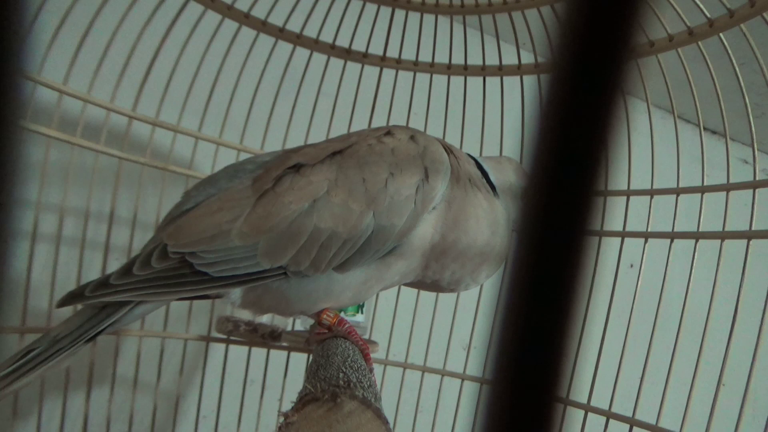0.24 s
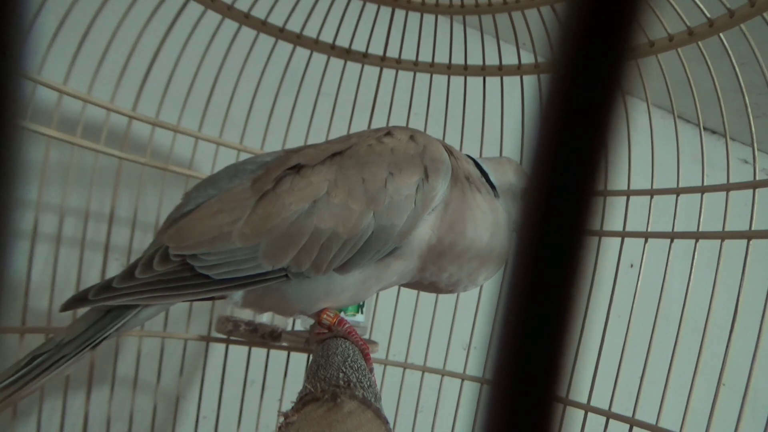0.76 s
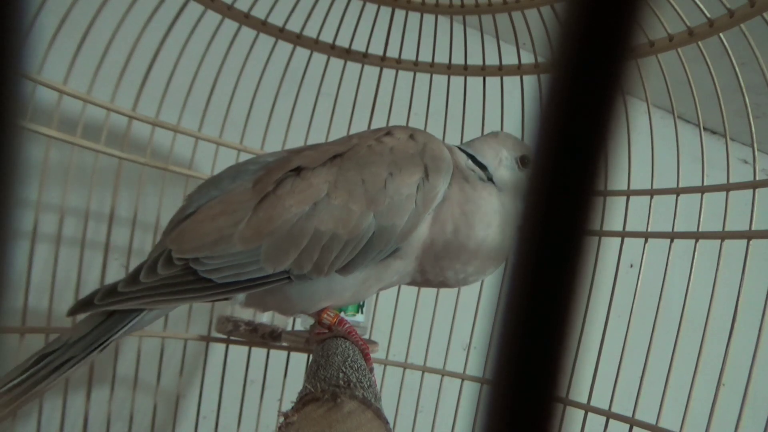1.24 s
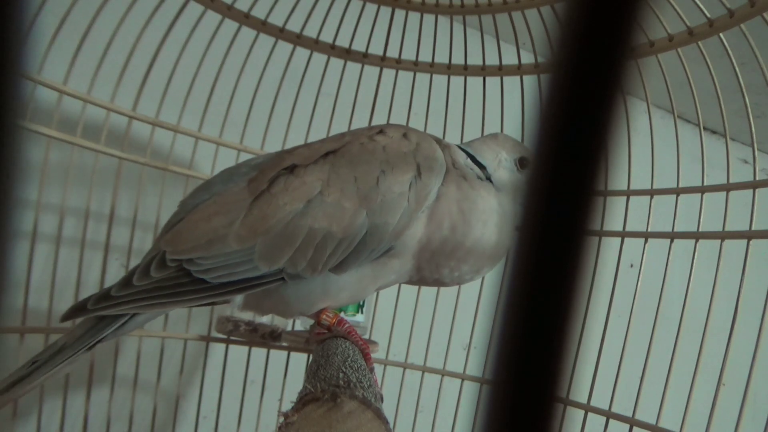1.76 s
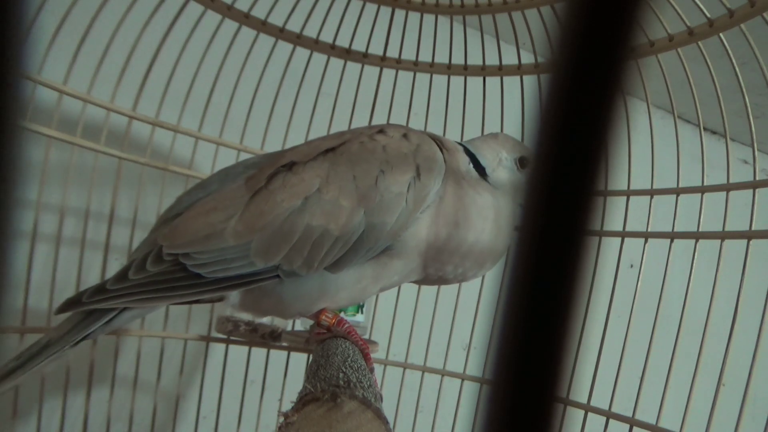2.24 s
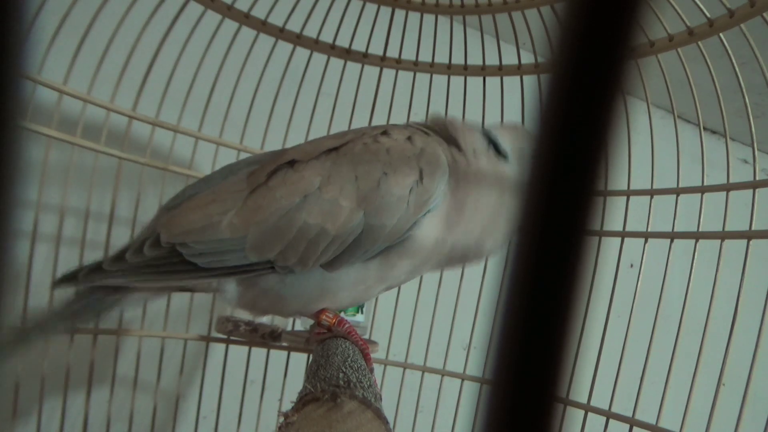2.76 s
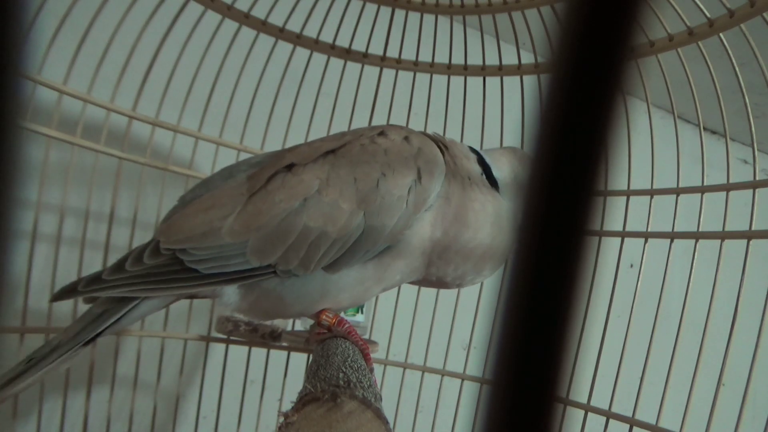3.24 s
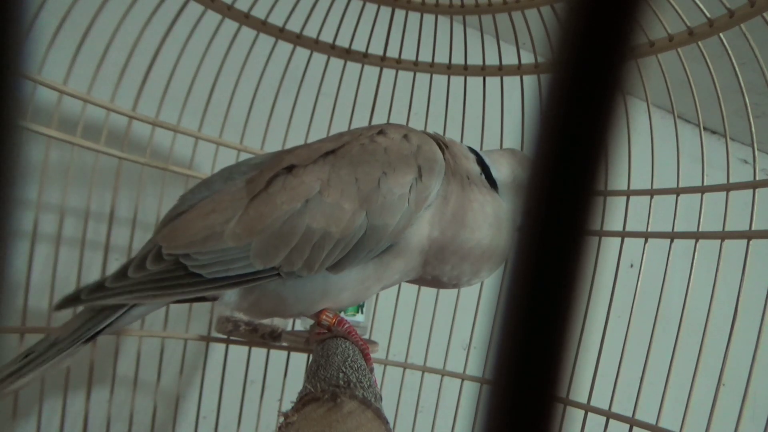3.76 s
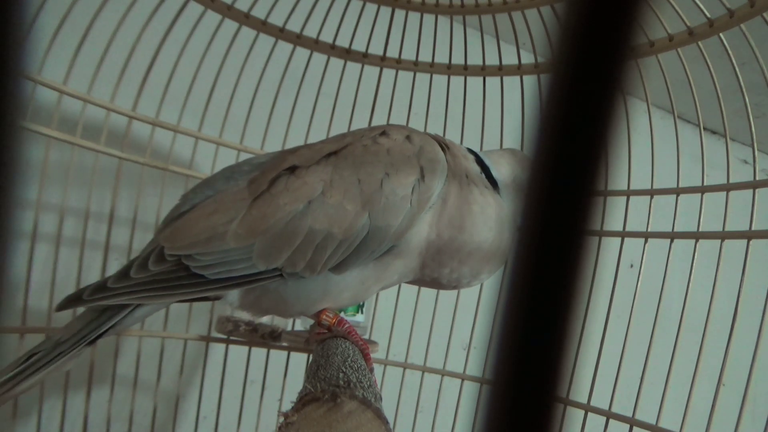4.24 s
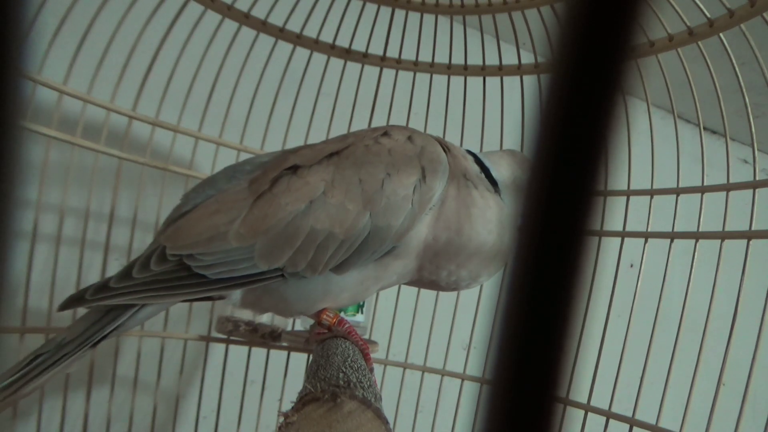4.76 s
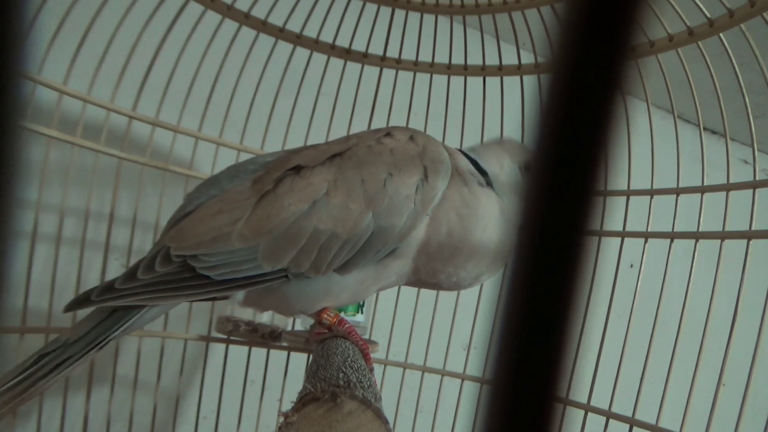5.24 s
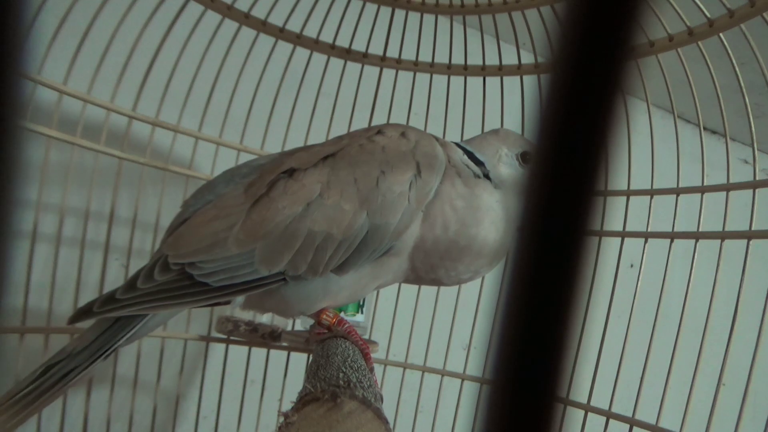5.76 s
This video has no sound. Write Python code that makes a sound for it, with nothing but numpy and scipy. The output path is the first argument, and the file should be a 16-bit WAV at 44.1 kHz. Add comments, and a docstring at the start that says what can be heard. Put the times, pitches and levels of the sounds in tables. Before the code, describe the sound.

Close to the microphone, a dove's smooth, hollow coo is already sounding; it wavers, sags and breaks into a short low tail. Small raspy chirps come early from another bird further off. Nasal, buzzing moans of drawn air follow, then a brief hoot, a stuttering trill and a second long falling coo. The hard room rings long around it, with faint cage ticks, low rumble and soft hiss.

```python
"""A long dove's coo, already under way, sags and breaks into a low tail while a small bird chirps further off.
Low nasal moans of drawn air follow, then a short note, a stuttering trill and a second long falling coo.
The dove is a near-pure gliding tone with faint overtones and rushing air; its moan is a resonant buzz.
The chirps are roughened glides and the cage ticks are dying noise bursts. Room modes ring against the coo,
a diffuse tail follows every call, and steady rumble and hiss lie beneath."""
import sys
import numpy as np
from scipy import signal
from scipy.fft import rfft, irfft, next_fast_len
from scipy.io import wavfile
from scipy.ndimage import map_coordinates

SR = 44100
rng = np.random.default_rng(int(sys.argv[2]) if len(sys.argv) > 2 else 0)


def persist_wave(psi):
    """Save psi, clipped to +-1, as 16-bit WAV."""
    counts = np.round(np.clip(psi, -1, 1) * 32767).astype(np.int16)
    wavfile.write(sys.argv[1], SR, np.atleast_2d(counts).T)


N = 264820

# Long coos, in the upper register from jump to break; the first begins before 0 s:
# jump_s, break_s, level_db, pitch_hz, slow_sag_hz, last_droop_hz
LONG_COOS = [(-0.508, 1.399, -10.5, 557.6, 47.18, 35.8), (3.868, 5.743, -11.5, 558.4, 73.15, 6.3)]
# Short notes that stay in the upper register: jump_s, end_s, level_db, pitch_hz, sag_hz, low_lead_in_db
SHORT_NOTES = [(2.81, 2.954, -11.5, 573.1, 45.3, -7.5), (3.782, 3.803, -10.5, 512.5, 13, -40)]
# Pulses of the low trill leading into each long coo: start_before_jump_s, length_s, level_db
TRILL_PULSES = [(.483, .05, -29), (.385, .03, -22), (.341, .045, -20), (.296, .054, -17.6),
                (.234, .054, -16), (.171, .074, -16.3), (.058, .05, -21)]
# Brief swells and dips of the sung tone: centre_s, half_width_s, change_db
LEVEL_WAVERS = [(.44, .1, 2), (.71, .06, -2.5), (1.12, .07, -6), (1.298, .035, 3.3), (5.35, .055, -4)]
# Overtones escaping the closed beak, relative strength: frequency_hz, level_db
BEAK_RESPONSE = [(900, -58.5), (1060, -42.5), (1250, -50.5), (1450, -36), (1560, -34.5), (1720, -37),
                 (1930, -56.5), (2110, -50), (2600, -72), (4200, -68.5), (4800, -52), (5500, -77.5),
                 (7300, -61), (8400, -71), (9500, -63), (11000, -71)]
# Change of overtone strength around the break between registers: pitch_hz, change_db
REGISTER_BRIGHTNESS = [(410, -1), (435, -3.5), (455, -12), (485, -4.5), (510, 2.5), (527, 2), (570, 3)]
# Spectrum of the rush of air in the dove's throat: frequency_hz, relative_level_db
AIR_SPECTRUM = [(600, -10), (1500, 0), (2500, -6.5), (4700, -3), (5800, -11), (9500, -10), (14000, -25)]
# Standing waves of the room: resonance_hz, gain_db, t60_s, polarity (+1 or -1)
ROOM_MODES = [(357, -16.5, 2.0, 1), (405, -3.5, 4.2, -1), (403, 0.5, 3.5, -1), (415.6, -8, 1.8, 1),
              (418.7, 3.5, 3.8, 1), (424.3, 0.5, 6.3, 1), (427.6, 1.0, 2.7, 1), (442, 2.7, 5.6, 1),
              (448.7, 9, 6, 1), (464, 4.3, 6.4, -1), (482, -10.5, 2.01, -1), (485, 4.2, 1.9, 1),
              (494.4, 1, 4, 1), (498, -13.5, 2.02, 1), (514.6, -6.5, 3.8, 1), (513.4, -5.5, 1.2, -1),
              (514.6, 12, 2.52, 1), (519, -14.5, 4.1, 1), (526.5, -10.5, 2.7, -1), (537.8, 10.5, 2.9, 1),
              (552.3, 4.5, 4.7, 1), (530, -6, 1.98, 1), (562.4, 9, 2.6, 1), (579, 2, 3.4, 1)]
# Decay of the diffuse tail: frequency_hz, t60_s
DIFFUSE_DECAY = [(200, 3.9), (480, 3.3), (900, 1.4), (1550, 1.8), (3000, 0.75), (10000, 0.47)]
# Spectrum of the room's rumble: frequency_hz, relative_density_db_per_hz
RUMBLE_SPECTRUM = [(12, -39), (20, -16), (32, -14), (102, 1), (231, -10.5), (274, -13), (300, -9.5),
                   (390, -38.5), (660, -120)]
# Spectrum of the steady hiss: frequency_hz, relative_density_db_per_hz
HISS_SPECTRUM = [(250, -3.5), (600, -3.5), (1000, -1.5), (1600, -2), (2200, -8), (4500, -13), (6000, -16),
                 (9500, -17), (12500, -20), (16000, -21)]
# Left-right likeness of noise: frequency_hz, correlation (0-1)
STEREO_LIKENESS = [(60, 0.37), (130, 0), (300, 0), (1500, .5), (5000, 0.36), (10000, 1)]
# Light scratches and ticks in the cage: start_s, relative_level_db
CAGE_CONTACTS = [(0.0247, -42.5), (0.129, -42.5), (1.4392, -46), (1.917, -43.5), (1.9372, -43),
                 (2.1036, -45.5), (2.4033, -43.5), (2.7046, -49), (3.686, -47.5), (3.8831, -43.5),
                 (4.8978, -40.5), (4.9299, -44.5), (5.3131, -41.5), (5.5316, -41)]
# Spectrum of those contacts: frequency_hz, relative_level_db
CONTACT_SPECTRUM = [(1500, -24), (2600, -7), (3600, 0), (4900, -4.5), (6000, -18), (11000, -17),
                    (16000, -30)]
# The small bird's notes, levels before the mix:
# start_s, length_s, start_hz, end_hz, level_db, octave_db, rasp (0-1)
CHIRP_NOTES = [(0.205, 0.067, 4510, 4540, -43.5, -5.5, 0.17), (0.237, 0.064, 4710, 5510, -41, -9, 1),
               (.235, .07, 2300, 3030, -45.5, -18.5, .8), (0.291, .06, 3830, 3300, -44.5, -14.5, 1),
               (0.346, 0.057, 3393, 3805, -39, -12, 0.9), (0.378, 0.065, 4715, 5100, -42.5, -7, .9),
               (0.581, .025, 3460, 3160, -48, -17.5, .6), (0.607, 0.052, 2987, 3494, -39, -15, 0.97),
               (0.629, 0.043, 7030, 5770, -48.5, -20.5, .5), (.66, .04, 4430, 4690, -36, -16.5, 0.8)]
# The dove's voiced intakes of air, levels before the mix:
# start_s, crest_s, end_s, crest_pitch_hz, end_pitch_hz, throat_hz, throat_width_hz,
# level_db, fade_db, whistle_db
AIR_INTAKES = [(1.682, 1.804, 2.43, 205, 147.6, 567, 146.1, -32.5, 14.5, -66.5),
               (2.44, 2.48, 2.69, 130, 116.2, 781.4, 105.4, -38.5, 4.5, -61)]
# Spectrum of the faint whistle of drawn air: frequency_hz, relative_level_db
NOSTRIL_SPECTRUM = [(3500, -25.5), (4900, 0), (6000, -22), (7600, -2), (9000, -25.5)]

LEAD = SR  # samples sounding before 0 s
TOP_HZ = 15600  # band limit
RUMBLE_DB, HISS_DB = -49.5, -56
COO_DIFFUSE_DB = -20  # share of the pure tone in the diffuse tail
LOW_HZ, SCOOP_HZ, SCOOP_S = 420.6, 23.6, .012  # lower register, and its lift just before a jump
ATTACK_S, PUSH_DB = .035, 3.3  # the low swell before a long coo, louder than its held level
FLIP_S = 0.0044  # time to flip between registers
SETTLE_HZ, SETTLE_S, CREEP_HZ_PER_S = 39.83, .11, 14.6  # pitch settles down, then creeps up
SAG_POWER, DROOP_S = 4.15, .068  # as air runs out pitch sags ever faster, then droops at the break
TAIL_SAG_HZ_PER_S, TAIL_FADE_DB_PER_S, RELEASE_S = 95, 54, .007  # low tail after the break
TAIL_S, COLLAPSE_HZ, COLLAPSE_S = .245, 31.95, 0.028  # tail length, and its final drop of pitch
SHORT_SAG_POWER = 1.8  # a short note sags more evenly
TRILL_SKEW = .8  # under 1: a pulse rises faster than it falls
INTAKE_RISE_HZ_PER_S, INTAKE_FALL_POWER = 150, 0.64  # climb to the crest, then an ever slower fall
INTAKE_RELEASE_S = .012


def amp(db):
    """Logarithmic level: decibels become amplitude gain."""
    return 10 ** (np.asarray(db) / 20)


def unit(x):
    """Mean power: a signal is scaled to rms 1."""
    return x / np.sqrt(np.mean(x ** 2) + 1e-20)


def clock():
    """Sampled time in seconds, lead-in included."""
    return np.arange(-LEAD, N) / SR


def along(points, hz):
    """Logarithmic frequency: values are interpolated between (Hz, value) points."""
    f, v = np.transpose(points)
    return np.interp(np.log(hz + 1), np.log(f), v)


def step(x):
    """Smooth transition from 0 to 1 around x = 0."""
    return .5 + .5 * np.tanh(x)


def wobble(rate):
    """Band-limited fluctuation: a smooth curve through random knots, rate per second."""
    at = np.arange(LEAD + N) * rate / SR
    fine = np.arange(0, at[-1] + 1, 1 / 8)
    knots = rng.standard_normal(int(at[-1]) + 4)
    return np.interp(at, fine, map_coordinates(knots, [fine]))


def filtered(x, response):
    """Linear filtering: the spectrum is multiplied by a response of frequency."""
    m = next_fast_len(x.shape[-1] + 3 * SR, True)
    spectrum = rfft(x, m) * response(np.fft.rfftfreq(m, 1 / SR))
    return irfft(spectrum, m)[..., :x.shape[-1]]


def noise(spectrum):
    """Partial coherence: coloured stereo noise of rms 1 is built from independent mid and side."""
    def response(hz):
        turn = np.arccos(np.clip(along(STEREO_LIKENESS, hz), -1, 1)) / 2
        return amp(along(spectrum, hz)) * [np.cos(turn), np.sin(turn)]

    white = rng.standard_normal((2, LEAD + N))
    mid, side = filtered(white, response)
    return unit(np.array([mid + side, mid - side]))


def pan(x, left_db):
    """Interchannel level difference: a mono sound is placed by its excess on the left."""
    g = amp(left_db)
    return np.array([[g], [1]]) * 2 / (1 + g) * x


def jump_up(since, upper_hz, lead_db, held_db):
    """Register transition: pitch and effort swell low, lift, and flip to the upper register."""
    jumped = step(since / FLIP_S)
    low_hz = LOW_HZ + SCOOP_HZ * np.exp(-abs(since) / SCOOP_S)
    lead = amp(lead_db) * np.sin(np.pi / 2 * np.clip(1 + since / ATTACK_S, 0, 1)) ** 2
    return low_hz + jumped * (upper_hz - low_hz), lead + jumped * (amp(held_db) - lead)


def song():
    """Two-register phonation: pitch and effort of a syrinx that rests low and flips up for notes."""
    t = clock()
    pitch, effort = np.full(len(t), float(LOW_HZ)), np.zeros(len(t))
    for jump_s, break_s, db, hz, sag_hz, droop_hz in LONG_COOS:
        for before_s, length, pulse_db in TRILL_PULSES:
            pulse_s = jump_s - before_s
            span = (t > pulse_s) & (t < pulse_s + length)
            u = np.linspace(0, 1, span.sum())
            effort[span] += amp(pulse_db) * np.sin(np.pi * u ** TRILL_SKEW)

        span = (t > jump_s - ATTACK_S) & (t < break_s + TAIL_S + 10 * RELEASE_S)
        since, after = t[span] - jump_s, t[span] - break_s
        held, tail = np.clip(since, 0, break_s - jump_s), np.maximum(after, 0)
        settle = SETTLE_HZ * (1 - np.exp(-held / SETTLE_S)) - CREEP_HZ_PER_S * held
        slow_sag = sag_hz * (held / (break_s - jump_s)) ** SAG_POWER
        droop = droop_hz * np.exp(np.minimum(after, 0) / DROOP_S)
        high = hz - settle - slow_sag - droop
        collapse = COLLAPSE_HZ * np.exp(np.minimum(tail - TAIL_S, 0) / COLLAPSE_S)
        low = LOW_HZ - TAIL_SAG_HZ_PER_S * tail - collapse
        broken = step(after / FLIP_S)
        sung_hz = (1 - broken) * high + broken * low
        pitch[span], swell = jump_up(since, sung_hz, db + PUSH_DB, db)
        effort[span] += swell * amp(-TAIL_FADE_DB_PER_S * tail) * step((TAIL_S - after) / RELEASE_S)

    for jump_s, end_s, db, hz, sag_hz, lead_db in SHORT_NOTES:
        span = (t > jump_s - ATTACK_S) & (t < end_s + 2 * RELEASE_S)
        since = t[span] - jump_s
        spent = np.clip(since / (end_s - jump_s), 0, 1)
        pitch[span], swell = jump_up(since, hz - sag_hz * spent ** SHORT_SAG_POWER, lead_db, db)
        effort[span] += swell * step((end_s - t[span]) / RELEASE_S)

    waver_db = sum(db * np.exp(-((t - s) / width) ** 2) for s, width, db in LEVEL_WAVERS)
    return pitch, effort * amp(waver_db)


def coo(jitter=0.0065, shimmer=0.01, overtone_flutter_db=1.1, air_db=-48.5, full_swing=0.27, knee=.19):
    """Saturating syrinx: an almost pure fundamental, faint overtones and a rush of air."""
    pitch, effort = song()
    phase = 2 * np.pi * (np.cumsum(pitch) / SR + jitter * wobble(130))
    fundamental = np.sqrt(2) * effort * (1 + shimmer * wobble(380)) * np.sin(phase)
    overtones = 0
    for k in range(2, 21):
        level_db = along(BEAK_RESPONSE, k * pitch) + overtone_flutter_db * wobble(9)
        overtones = overtones + amp(level_db) * np.sin(k * phase)
    brightness = amp(along(REGISTER_BRIGHTNESS, pitch))
    # the membranes' swing saturates, so the overtones hold steady
    swing = full_swing * np.tanh(effort / knee)
    air = amp(air_db) * swing * np.sqrt(brightness) * noise(AIR_SPECTRUM)
    return fundamental, np.sqrt(2) * swing * brightness * overtones, air


def room_modes(f):
    """Modal resonance: the summed response of narrow, damped standing waves in the coo's range."""
    response = 0
    for hz, db, t60, polarity in ROOM_MODES:
        damping = 1j * f * np.log(1000) / (np.pi * t60)
        response = response + np.sign(polarity) * amp(db) * damping / (hz ** 2 - f ** 2 + damping)
    return response


def reverb(x, width=.85):
    """Diffuse reverberation: each frequency dies at its own speed, partly alike left and right."""
    mid, side = rng.standard_normal((2, 3 * SR // 2))
    stereo = mid + np.array([[width], [-width]]) * side
    hz, t, z = signal.stft(stereo, SR, nperseg=256)
    decay = amp(-60 * t / along(DIFFUSE_DECAY, hz)[:, None])
    tail = signal.istft(z * decay, SR, nperseg=256)[1]
    return signal.fftconvolve(x[None], tail / np.linalg.norm(tail[0]), axes=1)[:, :len(x)]


def noise_floor():
    """Stationary noise: low rumble and broadband hiss, each shaped by its own spectrum."""
    rumble = pan(amp(RUMBLE_DB) * noise(RUMBLE_SPECTRUM), left_db=2.0)
    return rumble + pan(amp(HISS_DB) * noise(HISS_SPECTRUM), left_db=0.2)


def cage_ticks(t60=0.14, gain_db=-10):
    """Damped contact: each light touch is a burst of coloured noise decaying exponentially."""
    t = np.arange(SR // 4) / SR
    force = np.zeros(LEAD + N + SR)
    for s, db in CAGE_CONTACTS:
        start = LEAD + int(s * SR)
        force[start:][:len(t)] += amp(db + gain_db - 60 * t / t60)
    return force[:LEAD + N] * noise(CONTACT_SPECTRUM)[0]


def small_bird(rasp_depth=0.072):
    """Frequency modulation: short two-partial glides, roughened by a fast flutter of pitch."""
    out, flutter = np.zeros(LEAD + N), wobble(900)
    for s, length, start_hz, end_hz, db, octave_db, rasp in CHIRP_NOTES:
        u = np.linspace(0, 1, int(length * SR))
        span = LEAD + int(s * SR) + np.arange(len(u))
        glide = start_hz + (end_hz - start_hz) * u
        pitch = glide * (1 + rasp_depth * rasp * flutter[span])
        phase = 2 * np.pi * np.cumsum(pitch) / SR
        partials = np.sin(phase) + amp(octave_db) * np.sin(2 * phase)
        out[span] += amp(db) * np.sin(np.pi * u) * partials
    return out


def intake(steepness=1.6, crop_db=-4, jitter=.018, flutter_db=3):
    """Source and filter: drawn air sounds a falling buzz, shaped by throat and swollen neck."""
    t, out, whistle = clock(), np.zeros(LEAD + N), noise(NOSTRIL_SPECTRUM)[0]
    unsteady, flutter, orders = wobble(80), wobble(35), np.arange(2, 10)[:, None]
    # the throat resonance is higher in the second intake, once the dove lifts its head
    for start, crest, end, crest_hz, end_hz, centre, width_hz, db, fade_db, whistle_db in AIR_INTAKES:
        span = (t > start) & (t < end + 2 * INTAKE_RELEASE_S)
        s = t[span]
        spent = np.clip((s - crest) / (end - crest), 0, 1)
        rise = crest_hz - INTAKE_RISE_HZ_PER_S * np.maximum(crest - s, 0)
        pitch = rise + (end_hz - crest_hz) * spent ** INTAKE_FALL_POWER
        phase = 2 * np.pi * np.cumsum(pitch * (1 + jitter * unsteady[span])) / SR

        throat = (1 + ((orders * pitch - centre) / width_hz) ** 2) ** -steepness
        # the swollen neck radiates a low partial near 362 Hz, and little below it
        crop = amp(crop_db) / (1 + ((orders * pitch - 362) / 14) ** 2)
        gains = (throat + crop) * step((orders * pitch - 345) / 12)
        partials = np.sum(gains * np.sin(orders * phase), axis=0)
        buzz = np.sqrt(2) * partials / np.linalg.norm(gains, axis=0)

        envelope = np.minimum((s - start) / (crest - start), 1) * step((end - s) / INTAKE_RELEASE_S)
        envelope = envelope * amp(-fade_db * spent ** 2)
        voiced = amp(db + flutter_db * flutter[span]) * buzz
        out[span] += envelope * (voiced + amp(whistle_db) * whistle[span])
    return out


def scene():
    """Superposition: direct sound, modal ringing, diffuse tail and noise floor add in one room."""
    tone, overtones, air = coo()
    ticks, chirps, moan = cage_ticks(), amp(-1) * small_bird(), intake()
    near = pan(tone + overtones + amp(-2.5) * moan, left_db=3) + air
    direct = near + pan(chirps + ticks, left_db=1.3)
    ringing = pan(filtered(tone + moan, room_modes), left_db=3.5)
    dove_send = amp(COO_DIFFUSE_DB) * tone + amp(-7) * overtones + amp(-8) * moan
    diffuse = reverb(dove_send + chirps + amp(-2) * ticks)
    return (direct + ringing + diffuse + noise_floor())[:, LEAD:]


def record(dry, ceiling=0.95):
    """Clipping and band limiting: peaks are cut at the ceiling, then the spectrum ends at TOP_HZ."""
    return filtered(np.clip(dry, -ceiling, ceiling), lambda hz: hz < TOP_HZ)


dry = scene()
out = record(dry)
persist_wave(out)
```